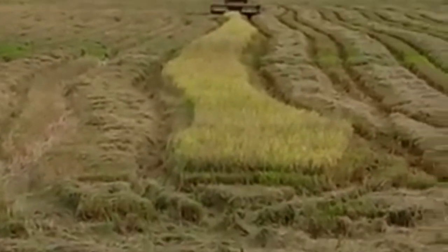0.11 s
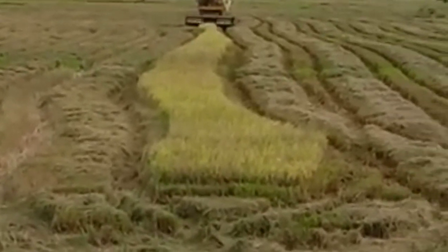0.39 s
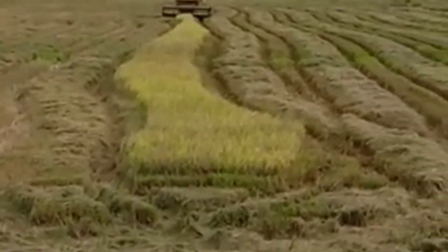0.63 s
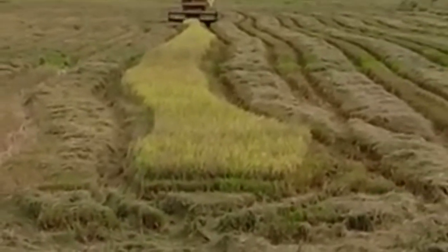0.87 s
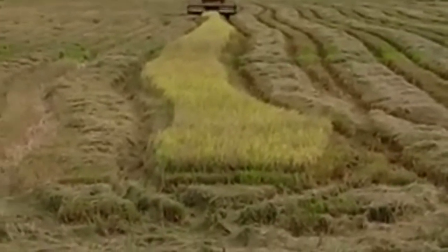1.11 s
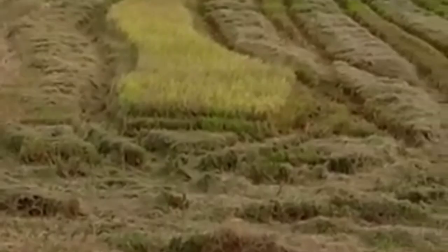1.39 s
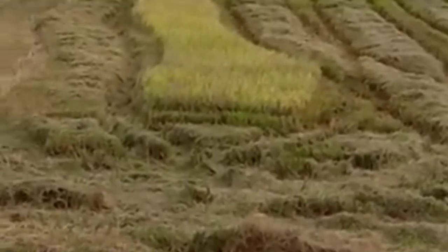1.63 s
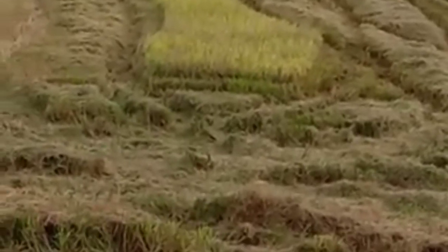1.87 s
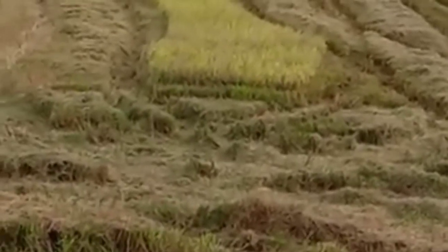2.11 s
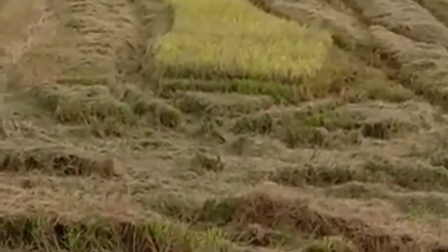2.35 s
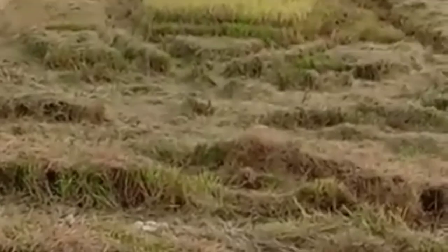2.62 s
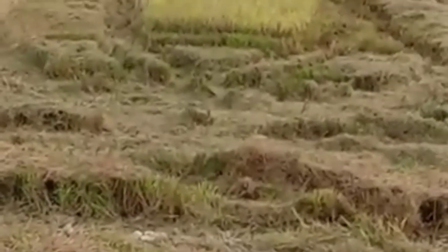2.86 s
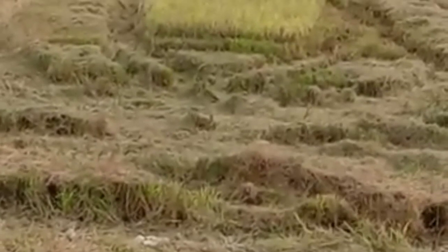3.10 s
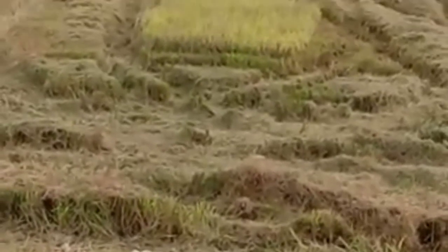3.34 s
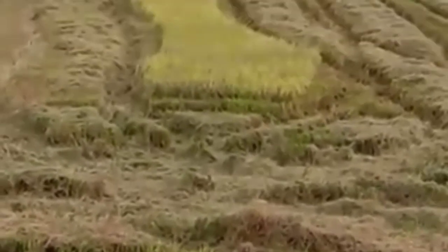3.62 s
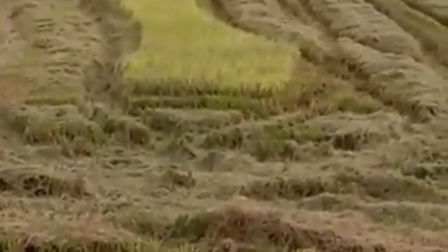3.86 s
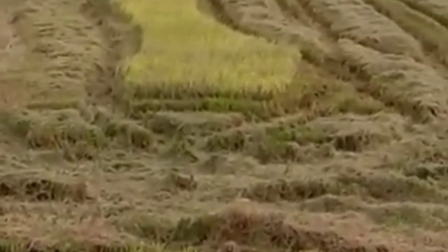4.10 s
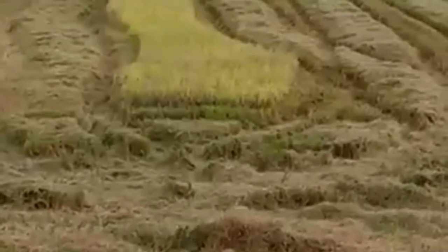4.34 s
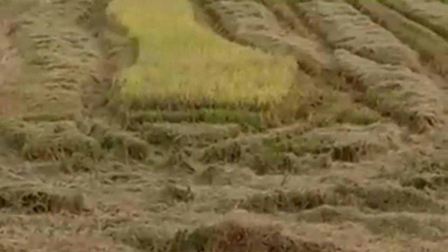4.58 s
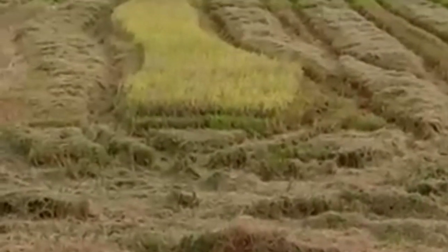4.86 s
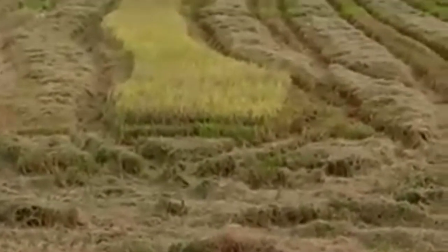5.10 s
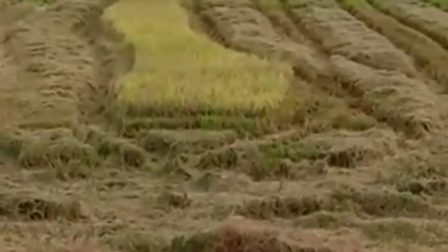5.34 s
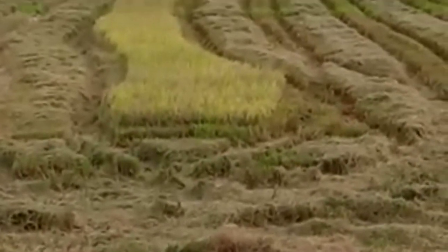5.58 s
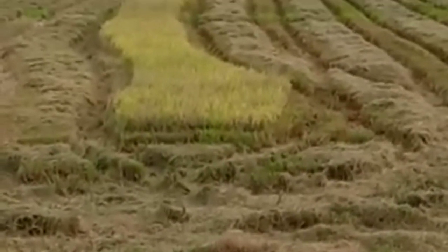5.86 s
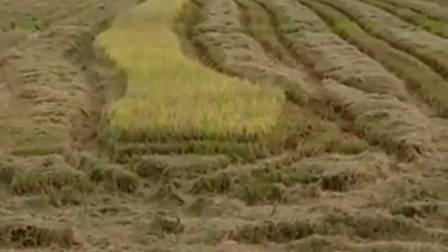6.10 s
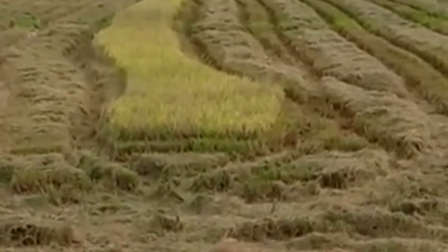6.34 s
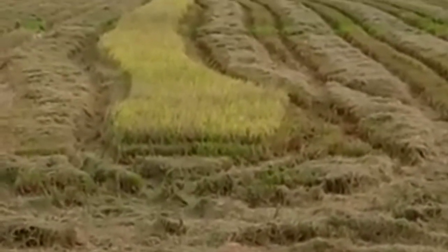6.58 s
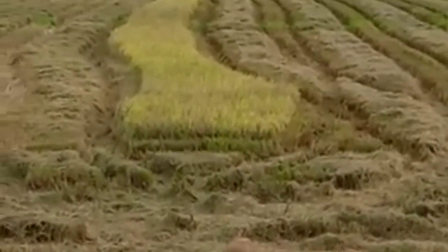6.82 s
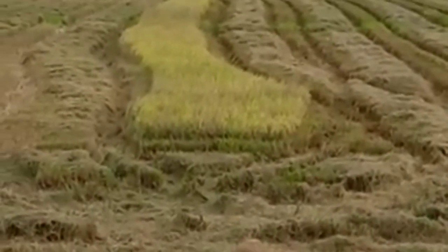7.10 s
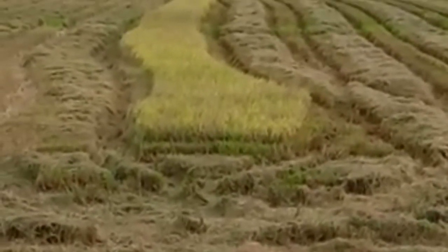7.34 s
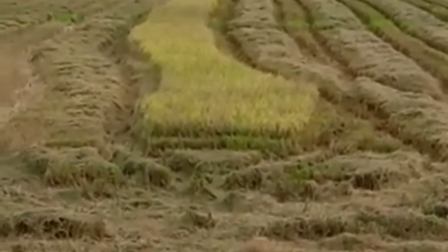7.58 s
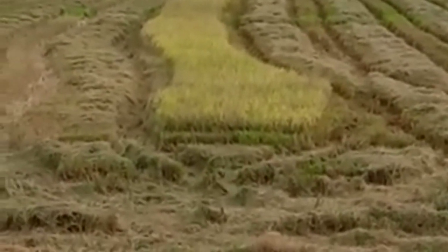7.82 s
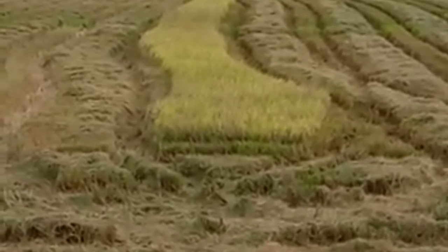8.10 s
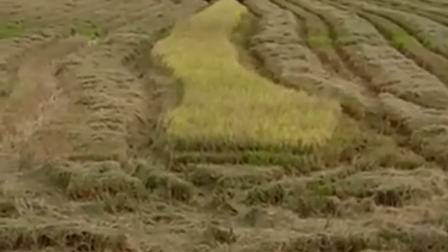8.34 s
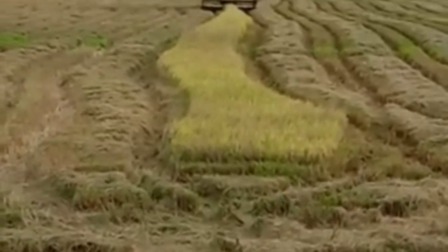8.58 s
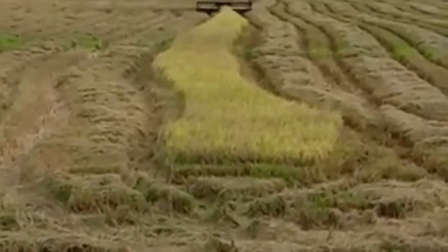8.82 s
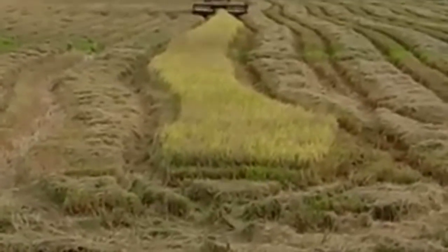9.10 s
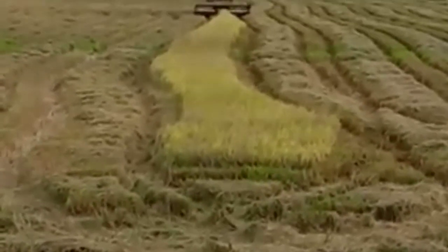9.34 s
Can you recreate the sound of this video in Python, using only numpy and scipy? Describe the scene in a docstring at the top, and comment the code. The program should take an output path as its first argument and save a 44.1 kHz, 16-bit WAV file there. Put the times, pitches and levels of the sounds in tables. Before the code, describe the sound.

Low wind buffeting dominates a small hand-held microphone, with fluttering, popping thumps and ragged overloaded peaks in the early part. Behind it a distant harvesting machine keeps a constant engine pace, its hum wavering in the moving air, with a pulsing roar, dry straw-like rustle and faint metal knocks. The wind drops midway, exposing the engine, then returns in shorter bursts.

```python
"""On a cut field, a harvester works far off while gusts hit the microphone of a small hand-held recorder.
Its diesel drone is a stack of sine waves on steady shaft orders. Its roar and clatter are bands of noise
ringing in the machine's body, plus short knocks. The wind is louder and closer: low noise for the buffet
and flutter, short swinging bursts for the thumps. Gain control turns everything down under loud blasts."""
import sys
import numpy as np
from scipy import signal
from scipy.fft import rfft, irfft, next_fast_len
from scipy.io import wavfile
from scipy.ndimage import uniform_filter1d, minimum_filter1d, map_coordinates

SR = 44100
rng = np.random.default_rng(int(sys.argv[2]) if len(sys.argv) > 2 else 0)


def makeup_ratio(level_db):
    """Linear amplitude ratio for a level in decibels (20 dB per factor of ten)."""
    decades = np.asarray(level_db, float) / 20
    return 10 ** decades


def generate_wav(sig):
    """Save sig (samples, or channels by samples) to the path in sys.argv[1] as 16-bit PCM at SR."""
    pcm = np.round(np.clip(np.atleast_2d(sig).T, -1, 1) * 32767).astype(np.int16)
    wavfile.write(sys.argv[1], SR, pcm)


N = 416744  # length [samples]


def unit(x):
    """Scaled to rms 1."""
    return x / np.sqrt(np.mean(x ** 2) + 1e-20)


def curves(rows):
    """One value per sample for each column after the time."""
    s, *columns = np.transpose(rows)
    return [np.interp(np.arange(N) / SR, s, column) for column in columns]


def along(points, hz):
    """Gain of (frequency [Hz], level [dB]) points read on a log axis."""
    f, db = np.transpose(points)
    return makeup_ratio(np.interp(np.log(hz + 1), np.log(f + 1), db))


def wobble(rate):
    """A smooth random curve with `rate` knots a second."""
    knots = rng.standard_normal(int(N * rate / SR) + 4)
    return map_coordinates(knots, [np.arange(N) * rate / SR])


def filtered(x, response):
    """x with each frequency turned up or down by response(Hz)."""
    m = next_fast_len(N + 8192)
    return irfft(rfft(x, m) * response(np.fft.rfftfreq(m, 1 / SR)), m)[:N]


def patchy(patchy_db):
    """White noise with patches of random gain in time and frequency."""
    z = signal.stft(rng.standard_normal(N + 512), nperseg=512)[2]
    field = uniform_filter1d(rng.standard_normal(z.shape), size=2, axis=0)
    field = uniform_filter1d(field, size=8, axis=1)
    return signal.istft(z * makeup_ratio(patchy_db * unit(field)), nperseg=512)[1][:N]


def bursts(events, turns, boost_db):
    """A short swing growing to and dying from its peak, for each (time [s], level [dB], pitch [Hz])."""
    half = SR // 50
    out = np.zeros(N + 2 * half)
    t = np.arange(-half, half) / SR
    phases = rng.uniform(0, 2 * np.pi, len(events))
    for (s, db, hz), phase in zip(events, phases):
        swell = makeup_ratio(db + boost_db) * np.exp(-(t * hz / turns) ** 2)
        out[round(s * SR):][:len(t)] += swell * np.sin(2 * np.pi * hz * t + phase)
    return out[half:half + N]


# Tint of the microphone's own noise: (frequency [Hz], relative level per Hz [dB])
HISS_TINT = [(2000, -120), (3000, -14), (8000, 1), (15700, -8)]


def hiss():
    """The microphone's own noise: steady random noise, mostly treble."""
    return makeup_ratio(-75.5) * unit(filtered(rng.standard_normal(N), lambda f: along(HISS_TINT, f)))


# Pace of the exhaust, three beats to an engine cycle: (time [s], exhaust beat [Hz])
ENGINE_PACE = [(0, 59.93), (1.5, 60.02), (3.8, 60.05), (4.6, 60.28), (5.4, 60.11), (7.5, 59.46),
               (9.45, 59.8)]
# Strength of the drone: (time [s], drone level [dB], extra on orders above the tenth [dB])
DRONE_LEVEL = [(0, -39, -12), (.8, -28.5, -7.5), (1.4, -28.5, -3), (2.2, -29.5, -4.5), (3.3, -34, -2),
               (3.8, -30.5, 7.5), (4.4, -28, 4), (4.9, -31, 0.5), (5.4, -31, 3), (6, -27, -4.5),
               (6.7, -29.5, -2), (7.4, -32.5, 2), (8.2, -39.5, 8), (8.8, -32, 4), (9.45, -33.5, -21)]
# Mix of the shaft orders: (multiple of the engine cycle [1], relative level [dB])
SHAFT_ORDERS = [(1, -28.5), (2, -38), (3, -29), (4, -9), (5, -25.5), (6, 4.5), (7, -21.5), (8, -26),
                (9, -2), (10, -42), (11, -37), (12, -8), (13, -32), (14, -16.5), (15, -10), (16, -15),
                (17, -24), (18, -16.5), (19, -24), (20, -19), (21, -17.5), (22, -29.5), (23, -28.5),
                (24, -28.5), (25, -37), (26, -30), (27, -26), (28, -35)]


def exhaust():
    """Shaft orders, each wavering a little in the moving air; also returns the engine cycle's phase."""
    beat_hz, = curves(ENGINE_PACE)
    drone_db, upper_db = curves(DRONE_LEVEL)
    cycle = 2 * np.pi * np.cumsum(beat_hz / 3) / SR
    tone = 0
    for k, db in SHAFT_ORDERS:
        level = makeup_ratio(db + (k > 10) * upper_db + 2.2 * wobble(9))
        phase = k * cycle + rng.uniform(0, 2 * np.pi) + 0.026 * k * wobble(14)
        tone = tone + level * np.sin(phase)
    return makeup_ratio(drone_db) * unit(tone), cycle


# Resonances of the machine heard over the ground:
# (centre [Hz], width before narrowing below [Hz], relative level [dB])
BODY_RESONANCES = [(918, 153, -8.5), (1249.5, 114, 1.5), (1799, 235, -12.5), (2438, 367, -13),
                   (2820, 990, -20.5), (3870, 344, -12), (4767, 410, -22.5), (5530, 500, -23.5),
                   (7040, 500, -29.5)]
# Broad noise under the resonances: (frequency [Hz], relative level per Hz [dB])
BROAD_NOISE = [(35, -6), (60, 13), (120, 16), (230, 5.5), (400, -11), (580, 0.5), (700, -33), (1100, -4.5),
               (1500, -33), (3500, -34), (4350, -50), (6300, -36), (8500, -44.5), (15700, -55)]


def body(f):
    """How strongly the machine sounds at each frequency: resonant peaks over a broad floor."""
    power = along(BROAD_NOISE, f) ** 2
    for centre, width, db in BODY_RESONANCES:
        power = power + makeup_ratio(db) ** 2 / (1 + ((f - centre) / (0.81 * width)) ** 2) ** 3
    return np.sqrt(power)


def hum():
    """The low part of the broad machine noise, below 700 Hz, at a steady setting."""
    return makeup_ratio(-44.5) * unit(filtered(patchy(patchy_db=1.5), lambda f: along(BROAD_NOISE, f) * (f < 700)))


# Moments when the whole machine flares up: (time [s], half length [s], rise of the treble before sharing [dB])
FLARE_UPS = [(0.545, 0.061, 5.5), (0.72, 0.027, 2.5), (0.948, 0.095, 4.5), (2.108, 0.011, 8),
             (2.524, 0.017, 3.5), (2.697, .02, 6.5), (2.89, 0.018, 5), (3.04, 0.015, 8.5), (4.12, .06, 0.5),
             (4.45, .02, 0), (5.41, 0.011, 6), (5.553, 0.027, 6.5), (5.776, 0.012, 5), (6.8, .03, 2.5),
             (6.93, 0.013, 4.5), (7.094, 0.02, 4), (7.554, 0.031, 1), (7.75, 0.02, -0.5),
             (8.307, 0.064, 3.5), (8.58, .03, 2.5), (8.812, 0.014, 8), (8.945, 0.035, 5)]


def surges():
    """Sum of the brief flare-ups in dB, over a random unrest."""
    t = np.arange(0, N, 64) / SR
    flares = sum(rise_db * np.exp(-((t - s) / half) ** 2) for s, half, rise_db in FLARE_UPS)
    return np.interp(np.arange(N) / SR, t, flares) + 0.8 * wobble(16)


# Level of each range before the flare-ups:
# (time [s], engine roar [dB], drum [dB], belts [dB], straw rustle [dB])
WORKS_LEVEL = [(0, -45.5, -50, -60, -58.5), (.3, -42, -51.5, -61, -59.5), (.5, -43, -44, -49.5, -56),
               (.8, -46, -46.5, -52.5, -56.5), (1.05, -43, -47, -54.5, -54),
               (1.2, -42.5, -45.5, -61.5, -56.5), (1.8, -44, -47, -56, -56.5), (2.45, -50, -52, -72, -62.5),
               (2.9, -45, -50.5, -69, -62.5), (3.25, -44, -42, -54.5, -53.5),
               (3.6, -39.5, -46.5, -62, -61.5), (4.1, -40, -46, -56, -52.5), (4.4, -40.5, -47, -62, -58.5),
               (4.7, -41, -47, -61, -58), (4.9, -42, -47, -62, -59), (5.25, -38, -45, -53, -56.5),
               (5.7, -39.5, -47, -58, -58), (6.0, -40.5, -43.5, -52, -53.5),
               (6.25, -39.5, -43.5, -55, -57.5), (6.4, -40, -48, -66, -61), (6.75, -41, -47, -57.5, -52.5),
               (7.2, -41, -46.5, -56, -59.5), (7.5, -36, -42, -52, -52.5), (8.1, -41, -46, -53, -55),
               (8.7, -41.5, -46, -52.5, -54), (9.15, -40.5, -43, -51, -52), (9.45, -42, -44.5, -48.5, -52)]
# Part of a flare-up felt in each range: (engine roar [1], drum [1], belts [1], straw rustle [1])
FLARE_SHARE = (.35, .75, .9, 1.05)


def works(cycle):
    """Noise puffed by the firings rings in the body; each range rises and falls with the work."""
    puff = makeup_ratio(.7 * np.sin(3 * cycle) + .6 * np.sin(6 * cycle))
    unsteadiness = wobble(17)  # slow random unsteadiness shared by all ranges
    surge_db = surges()
    ranges = [  # (low [Hz], high [Hz], power put on the puff, slow unsteadiness [dB], fast spitting [dB])
        (700, 1500, 2.5, .3, 1.2),
        (1500, 3500, 0.19, 1.1, 1.3),
        (3500, 4350, .25, 1.4, 1.4),
        (4350, 16000, .2, 1.7, 1.9)]
    out = 0
    for (lo, hi, fired, slow_db, spit_db), db, share in zip(ranges, curves(WORKS_LEVEL), FLARE_SHARE):
        noise = patchy(patchy_db=2.5) * puff ** fired
        noise = noise * makeup_ratio(slow_db * unsteadiness + spit_db * wobble(110))
        band = filtered(noise, lambda f: body(f) * (f >= lo) * (f < hi))
        out = out + makeup_ratio(db + share * surge_db) * unit(band)
    return out


# Loose parts knocking and ticking: (time [s], level before the 13 dB cut below [dB], middle pitch [Hz])
KNOCKS = [(0.5257, -18, 2700), (1.0695, -45, 4690), (1.4237, -30, 2400), (1.511, -32, 5480),
          (2.0757, -35, 5170), (2.83, -33, 5240), (3.035, -24, 2370), (4.4553, -37, 4820),
          (4.6904, -31, 2490), (5.0295, -29, 2630), (5.7823, -32, 5390), (6.0995, -27, 2250),
          (6.2254, -25.5, 2440), (6.4418, -37, 5410), (7.5318, -34.5, 2560), (7.5378, -30, 4830),
          (8.3056, -29, 5300), (8.7804, -37, 5500), (8.8907, -38, 5540), (8.9531, -36, 5770),
          (9.232, -26, 2570), (9.3916, -34, 5660)]


def clanks():
    """Each knock rings three neighbouring plate modes at once."""
    out = 0
    for ratio in (.89, 1.01, 1.14):
        mode = [(s, db, hz * ratio) for s, db, hz in KNOCKS]
        out = out + bursts(mode, turns=6.3, boost_db=-13)
    return out


# Air always moving over the port: (time [s], buffet level before the wind trims [dB])
BREEZE_LEVEL = [(0, -32.5), (.6, -36.5), (1.0, -50), (1.38, -41), (1.55, -33), (2.5, -28.5), (3.5, -30),
                (3.9, -45), (4.8, -59), (5.2, -38.5), (5.5, -46), (5.9, -36.5), (6.9, -41), (7.45, -32),
                (7.9, -37), (8.3, -35), (8.7, -32), (8.9, -45), (9.45, -36)]
# Single gusts: (start [s], hold [s], buffet before the wind trims [dB], flutter before the wind trims [dB])
GUSTS = [(.045, 0.042, -22, -19.5), (0.107, 0.033, -29.5, -32.5), (0.214, 0.031, -23, -18),
         (.3, 0.0535, -23.5, -26), (0.511, 0.023, -26, -23), (.57, 0.067, -27, -26.5),
         (0.837, .04, -36, -45), (1.443, 0.086, -29.5, -34.5), (1.749, 0.092, -27, -26.5),
         (1.88, .13, -25, -27.5), (1.993, 0.051, -18.5, -12.5), (2.145, 0.041, -20, -15.5),
         (2.246, 0.18, -17, -18.5), (2.386, 0.072, -21, -23), (2.545, 0.028, -24, -14.5),
         (2.642, 0.084, -22.5, -27), (2.732, .1, -16.5, -10), (2.842, 0.062, -20.5, -19.5),
         (2.92, .06, -17, -14.5), (3.017, 0.033, -21.5, -19), (3.063, 0.079, -21.5, -15.5),
         (3.258, 0.081, -26, -19.5), (3.363, 0.12, -15, -12), (3.468, 0.068, -25.5, -19.5),
         (3.712, 0.1, -28, -33), (5.233, 0.076, -31, -42), (5.563, .08, -23, -16.5),
         (5.634, .11, -18.5, -19.5), (6.083, 0.014, -31.5, -27.5), (6.128, 0.027, -26, -21.5),
         (6.17, 0.029, -23.5, -35), (6.465, .08, -27.5, -35), (7.012, 0.044, -27, -44),
         (7.278, 0.039, -31.5, -42), (7.616, .04, -20, -29), (7.655, 0.053, -18, -20.5),
         (7.74, 0.027, -29, -29), (7.819, 0.036, -29.5, -31), (7.94, 0.017, -24.5, -37),
         (8.017, .03, -24.5, -40), (8.13, 0.031, -25.5, -32.5), (8.254, .015, -24.5, -33),
         (8.34, 0.022, -18.5, -16.5), (8.4, 0.018, -19, -21), (8.428, 0.131, -18.5, -18.5),
         (8.62, .04, -22.5, -36), (8.694, 0.036, -27, -42), (8.962, .1, -21, -28),
         (9.098, 0.044, -31.5, -41), (9.359, 0.03, -27, -45)]


def gusts():
    """Buffet and flutter levels in dB: the breeze, or the gust that rises, holds and falls above it."""
    rise, sag, fall = 901, 31, 499  # dB per s; the sag makes a gust hit hardest at its front
    t = np.arange(0, N, 64) / SR
    start, hold, buffet_db, flutter_db = np.transpose(GUSTS)[:, :, None]
    down_db = rise * np.maximum(start - t, 0)
    down_db = down_db + sag * np.clip(t - start, 0, hold)
    down_db = down_db + fall * np.maximum(t - start - hold, 0)

    def strongest(db):
        return np.interp(np.arange(N) / SR, t, (db - down_db).max(axis=0))

    breeze_db, = curves(BREEZE_LEVEL)
    breeze_flutter_db = np.maximum(breeze_db - 6.5, -41)
    return np.maximum(strongest(buffet_db), breeze_db), np.maximum(strongest(flutter_db), breeze_flutter_db)


# Tint of the deep wind noise: (frequency [Hz], relative level per Hz [dB])
BUFFET_TINT = [(20, -34), (40, -30.5), (63, -7), (90, 1.5), (140, -0.5), (220, -12.5), (400, -28),
               (600, -120)]


def buffet(buffet_db, lumps):
    """Deep noise of air rolling over the port in lumps."""
    noise = rng.standard_normal(N) * makeup_ratio(2.0 * lumps + 1.2 * wobble(6.9))
    return makeup_ratio(buffet_db + 3.0) * unit(filtered(noise, lambda f: along(BUFFET_TINT, f)))


# Tint of the faster wind noise: (frequency [Hz], relative level per Hz [dB])
FLUTTER_TINT = [(60, -53), (130, -3), (220, -3), (350, -4.5), (500, -12.5), (800, -32.5), (1300, -32),
                (1800, -120)]


def flutter(flutter_db, lumps):
    """Higher noise with faster unrest, strongest in the gusts."""
    noise = rng.standard_normal(N) * makeup_ratio(2.66 * lumps + 3.8 * wobble(80))
    return makeup_ratio(flutter_db - 6.5) * unit(filtered(noise, lambda f: along(FLUTTER_TINT, f)))


# The strongest eddies bursting on the port, levels before the trims below and in wind():
# (time of the peak [s], thump level [dB], pitch [Hz], snap level [dB])
STRONG_EDDIES = [(0.046, -16.5, 200, -43), (0.071, -6, 264, -43), (0.244, -11.5, 218, -37),
                 (0.321, -19, 170, -52), (0.344, -17, 171, -61), (0.516, -13.5, 165, -40),
                 (0.609, -15, 158, -57), (0.633, -15, 157, -54), (1.453, -18, 172, -45),
                 (1.601, -19, 157, -49), (1.784, -20, 160, -42), (1.833, -10.5, 159, -53),
                 (1.866, -16.5, 188, -54), (1.933, -11, 188, -30), (1.972, -11, 225, -24),
                 (2.034, -14, 174, -31), (2.085, -14.5, 160, -41), (2.154, -15, 250, -35),
                 (2.173, -15, 205, -25), (2.266, -16, 216, -43), (2.333, -12, 182, -41),
                 (2.405, -6, 184, -33), (2.45, -15, 169, -49), (2.478, -8, 149, -38),
                 (2.552, -5.5, 242, -20), (2.595, -16.5, 150, -46), (2.66, -17, 182, -46),
                 (2.72, -13, 170, -52), (2.739, -10.5, 234, -11), (2.766, -5, 320, -10),
                 (2.799, -10, 193, -19), (2.854, -12, 160, -43), (2.896, -8, 160, -52),
                 (2.923, -10.5, 175, -22), (2.965, -1, 183, -11), (3.005, -9, 169, -49),
                 (3.082, -11.5, 260, -28), (3.103, -12, 168, -47), (3.127, -26, 196, -33),
                 (3.182, -12.5, 167, -38), (3.244, -13, 212, -48), (3.281, -16, 234, -29),
                 (3.309, -13.5, 202, -48), (3.372, -14, 167, -21), (3.403, -12, 193, -24),
                 (3.445, -20, 180, -34), (3.52, -12, 220, -48), (3.544, -15, 160, -50),
                 (3.749, -20.5, 226, -39), (5.564, -16.5, 169, -49), (5.606, -12, 223, -36),
                 (5.635, -12, 206, -28), (5.723, -16, 192, -37), (5.778, -18.5, 182, -55),
                 (6.083, -23, 158, -45), (6.136, -27, 197, -51), (6.195, -22.5, 150, -52),
                 (7.651, -22, 181, -52), (7.676, -19, 248, -31), (7.702, -7, 266, -20),
                 (7.866, -11, 195, -50), (8.043, -17.5, 188, -60), (8.189, -16.5, 170, -51),
                 (8.267, -16, 173, -53), (8.342, -19, 251, -42), (8.362, -9.5, 179, -31),
                 (8.435, -17.5, 219, -33), (8.468, -17, 179, -41), (8.503, -9, 222, -23),
                 (8.984, -14.5, 210, -50), (9.021, -15, 180, -47)]


def eddies(flutter_db):
    """Each eddy is a low thump with a sharp edge; small random ones follow the flutter level."""
    gap_s, usual_hz = .03, 181
    slots = np.arange(0, N / SR - gap_s, gap_s)
    times = slots + rng.uniform(0, gap_s, len(slots))
    size, pitch, edge = rng.standard_normal((3, len(slots)))
    small_db = flutter_db[(times * SR).astype(int)] + 2.5 + 2.5 * size
    small_hz = usual_hz * np.exp(.16 * pitch)
    small_snap_db = small_db - 30 + 5 * edge
    everyone = list(STRONG_EDDIES) + list(zip(times, small_db, small_hz, small_snap_db))
    thumps = bursts([(s, db, hz) for s, db, hz, _ in everyone], turns=0.63, boost_db=1.7)
    snaps = bursts([(s, snap_db, 680) for s, _, _, snap_db in everyone], turns=0.92, boost_db=-1.5)
    return thumps + snaps


# Tint of the crackle: (frequency [Hz], relative level per Hz [dB])
CRACKLE_TINT = [(300, -120), (450, 2.5), (650, -0.5), (1000, -10), (1500, -15), (1900, -120)]


def crackle(flutter_db, lumps):
    """Ragged top of the hardest gusts: noise growing 2.13 dB for each dB of flutter."""
    noise = rng.standard_normal(N) * makeup_ratio(2.4 * lumps + 5.1 * wobble(90))
    level_db = -35.5 + 2.13 * (flutter_db + 12.5)
    return makeup_ratio(level_db) * unit(filtered(noise, lambda f: along(CRACKLE_TINT, f)))


def wind():
    """Eddies roll over the port: buffet, flutter and crackle share their lumps, thumps burst singly."""
    exposure_db = 3  # how open the port is to the wind
    buffet_db, flutter_db = gusts()
    lumps = wobble(35)
    noises = buffet(buffet_db, lumps) + flutter(flutter_db, lumps) + crackle(flutter_db, lumps)
    return makeup_ratio(exposure_db) * (noises + eddies(flutter_db))


def scene():
    """Engine, works and wind at one microphone."""
    tone, cycle = exhaust()
    harvester = tone + works(cycle) + hum() + clanks()
    return (harvester + wind())[None]


def gain_control(x):
    """Turns the sound down by 0.47 dB for each dB its held peak is over the knee."""
    knee_db, duck = -15.5, 0.47
    held_peak = -minimum_filter1d(-np.abs(x), size=1800, axis=1)
    over_db = np.maximum(20 * np.log10(held_peak + 1e-9) - knee_db, 0)
    return x * makeup_ratio(uniform_filter1d(-duck * over_db, size=1500, axis=1))


# Uneven sample timing mirrors the sound around these: (frequency [Hz], timing error re one sample [dB])
TIMING_ERRORS = [(3885, -10.5), (7775, -16.5), (11655, -19), (15555, -22.5)]


def mirror_images(x):
    """A periodic timing error adds the slope of the wave times that error."""
    t = np.arange(N) / SR
    error = sum(makeup_ratio(db) * np.cos(2 * np.pi * hz * t) for hz, db in TIMING_ERRORS)
    return np.gradient(x, axis=1) * error


def roll_off(x):
    """The treble ends steeply here."""
    return signal.sosfilt(signal.butter(12, 15890, fs=SR, output="sos"), x)


def record(dry):
    """Gain control, soft overload on the peaks, hiss, faint mirror images and a treble limit."""
    x = gain_control(dry)
    x = x / (1 + np.abs(x / .46) ** 5) ** (1 / 5)  # peaks bend over towards .46 of full scale
    x = x + hiss()
    x = x + mirror_images(x)
    mix = filtered(x[0], lambda f: f < 15780)[None]
    return roll_off(mix)


dry = scene()
out = record(dry)
generate_wav(out)
```